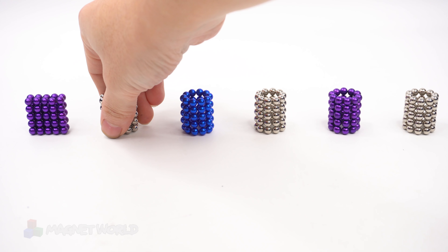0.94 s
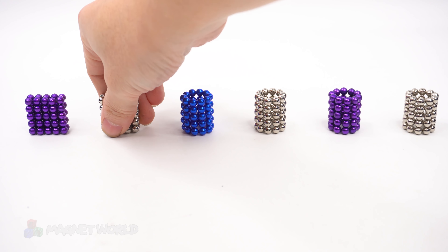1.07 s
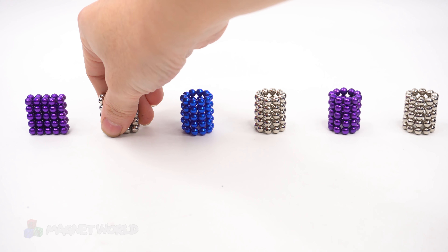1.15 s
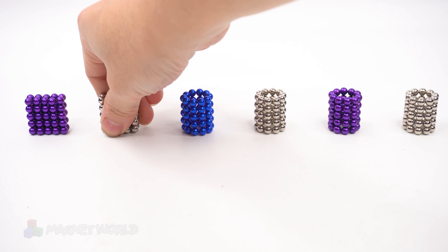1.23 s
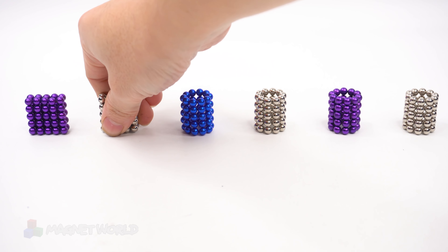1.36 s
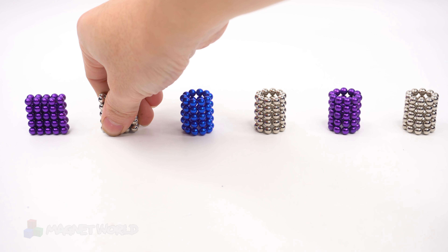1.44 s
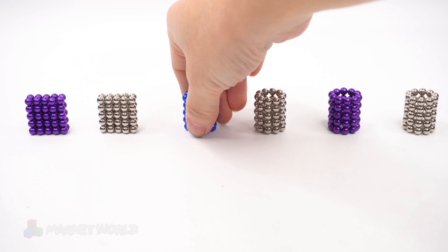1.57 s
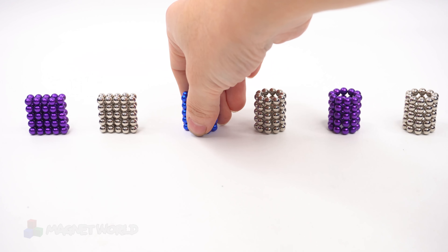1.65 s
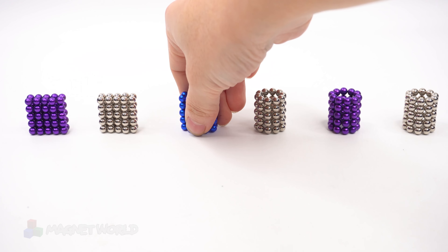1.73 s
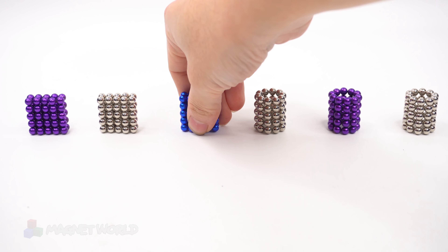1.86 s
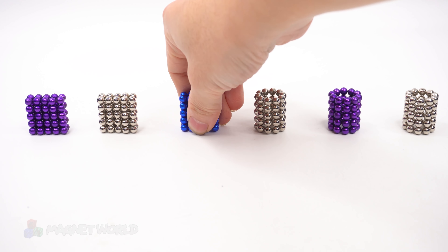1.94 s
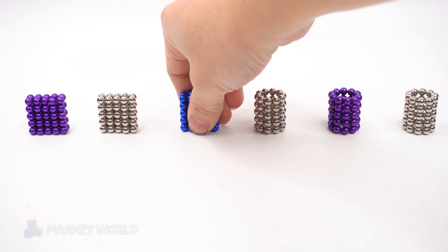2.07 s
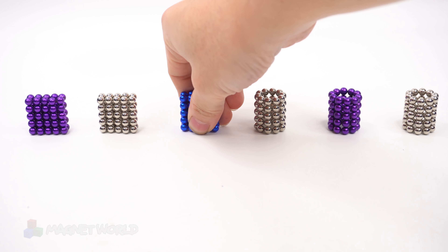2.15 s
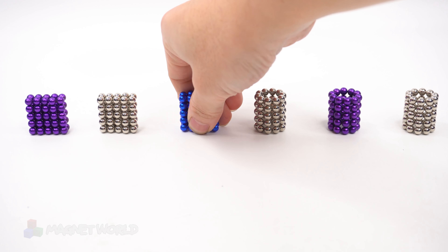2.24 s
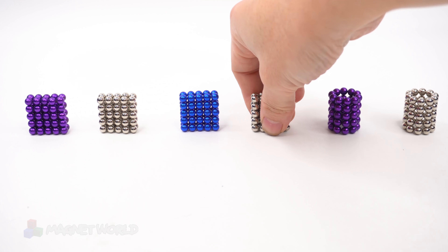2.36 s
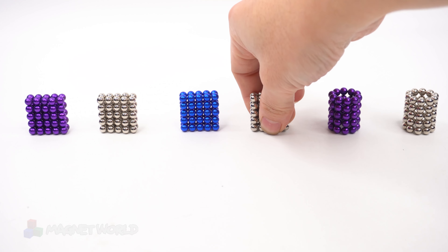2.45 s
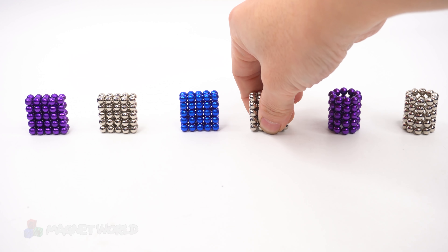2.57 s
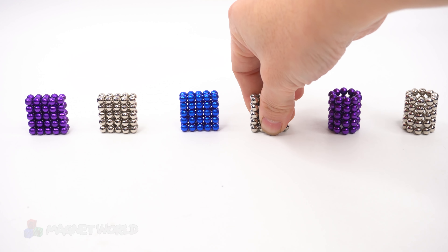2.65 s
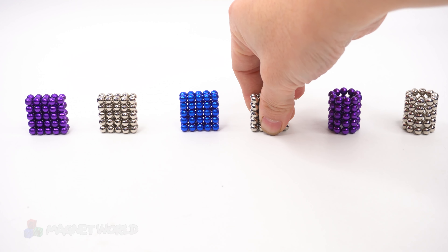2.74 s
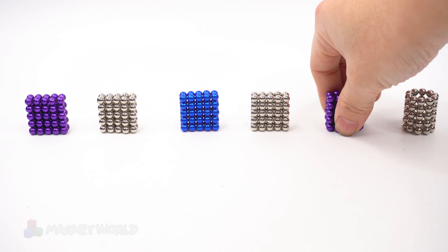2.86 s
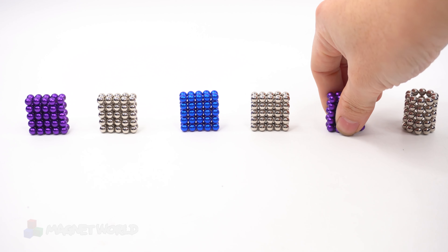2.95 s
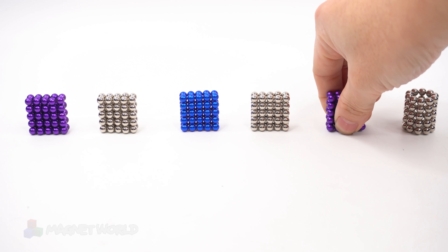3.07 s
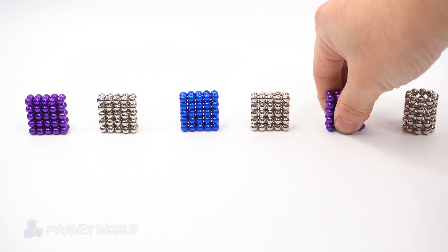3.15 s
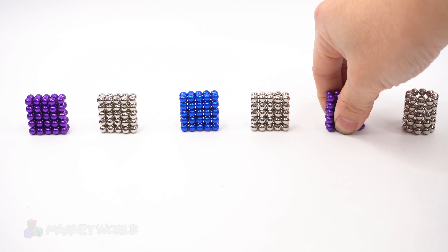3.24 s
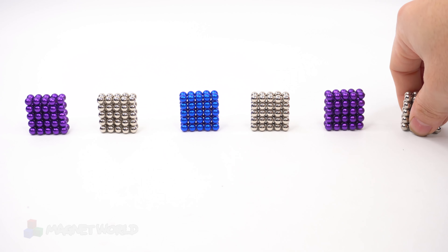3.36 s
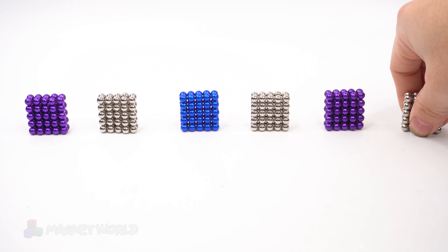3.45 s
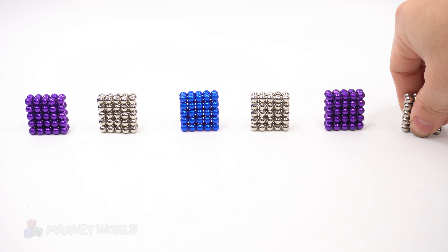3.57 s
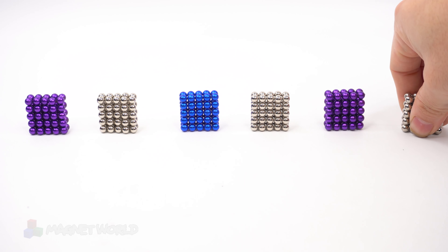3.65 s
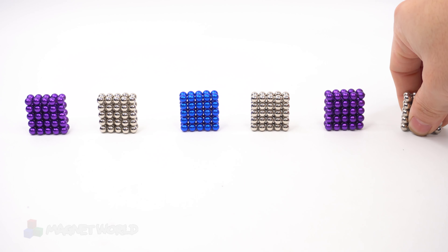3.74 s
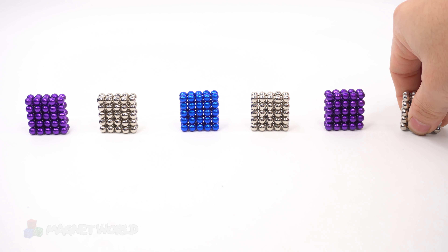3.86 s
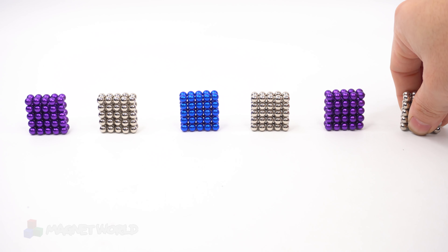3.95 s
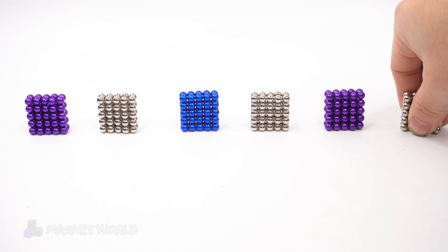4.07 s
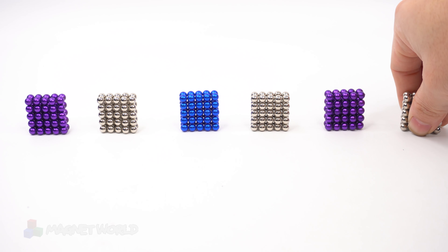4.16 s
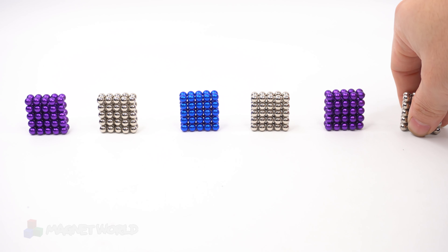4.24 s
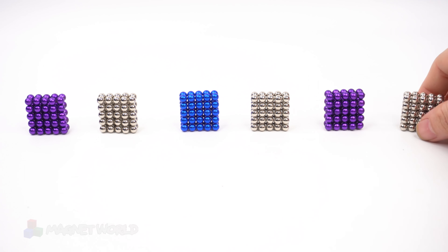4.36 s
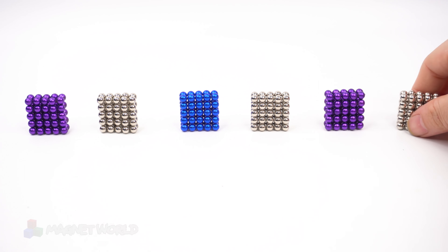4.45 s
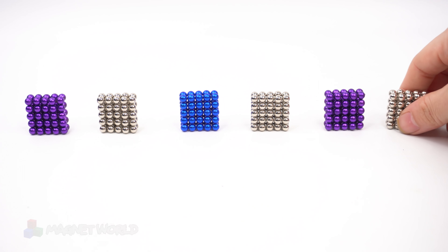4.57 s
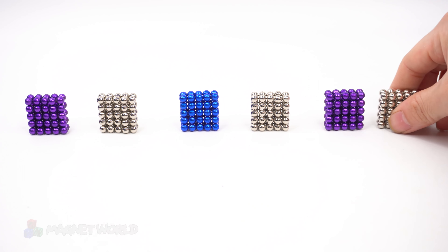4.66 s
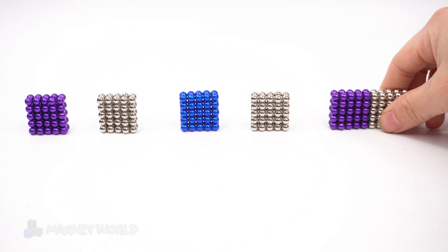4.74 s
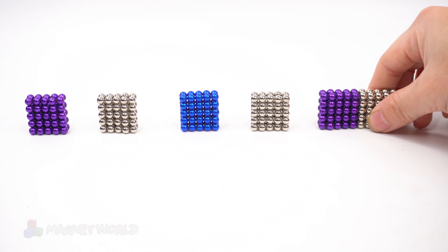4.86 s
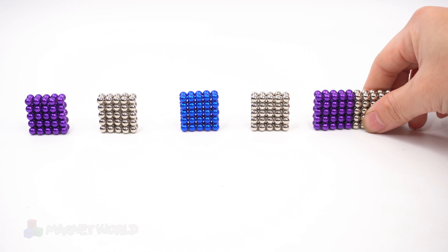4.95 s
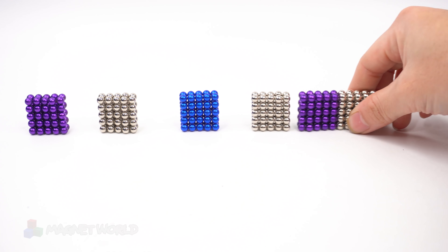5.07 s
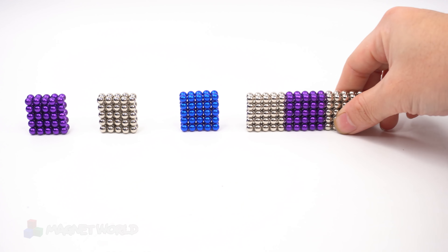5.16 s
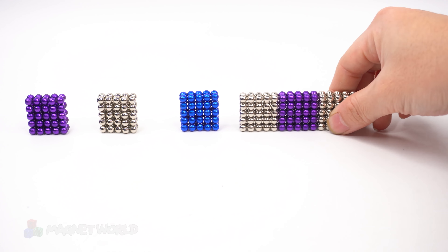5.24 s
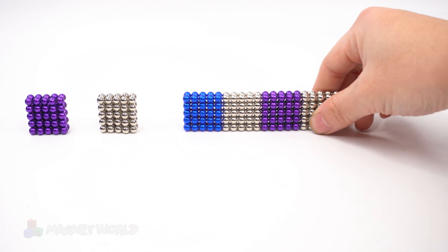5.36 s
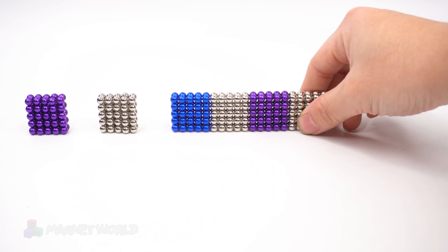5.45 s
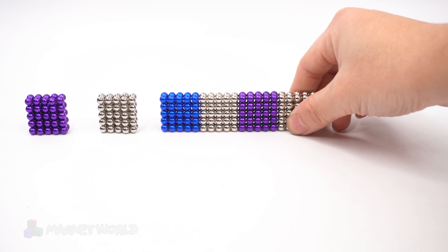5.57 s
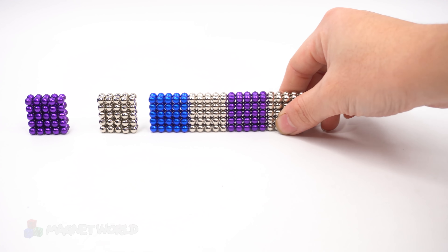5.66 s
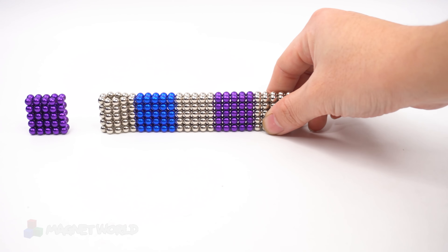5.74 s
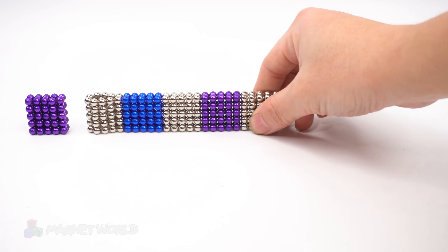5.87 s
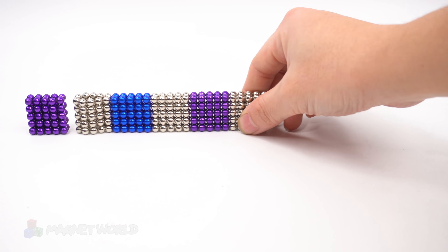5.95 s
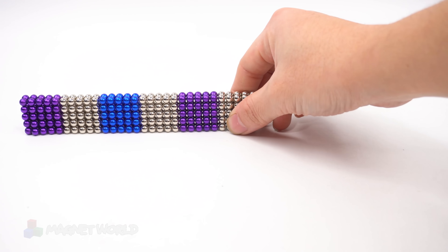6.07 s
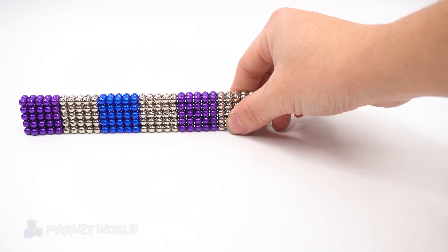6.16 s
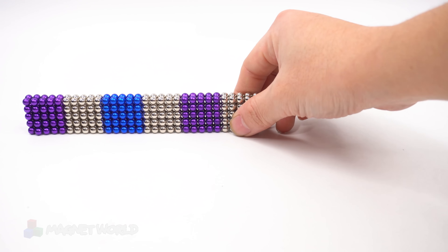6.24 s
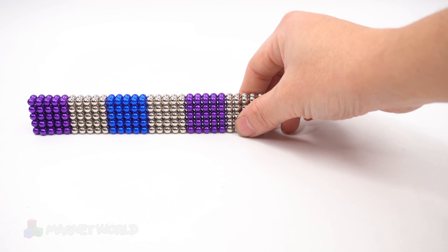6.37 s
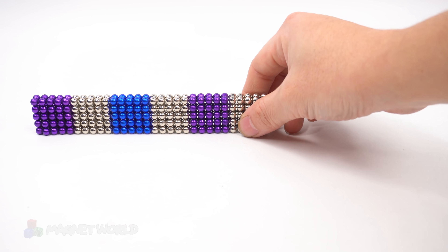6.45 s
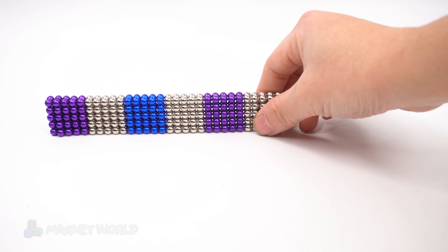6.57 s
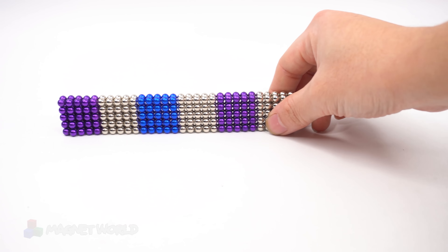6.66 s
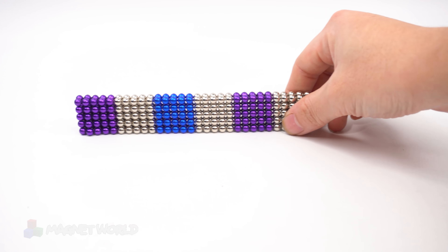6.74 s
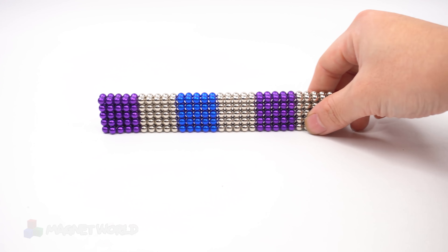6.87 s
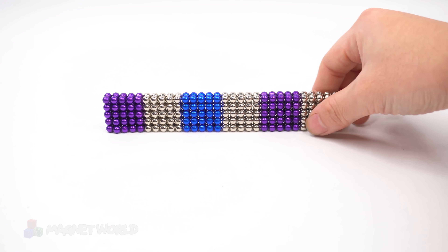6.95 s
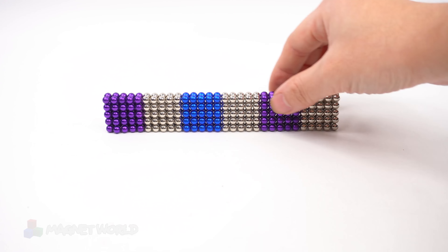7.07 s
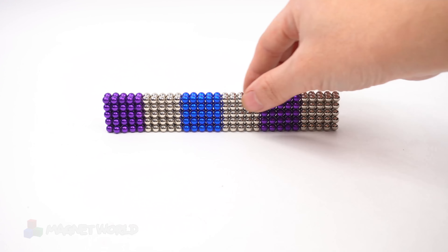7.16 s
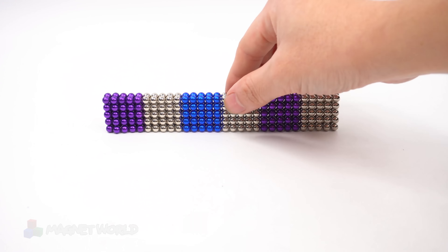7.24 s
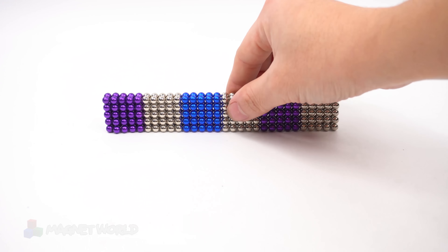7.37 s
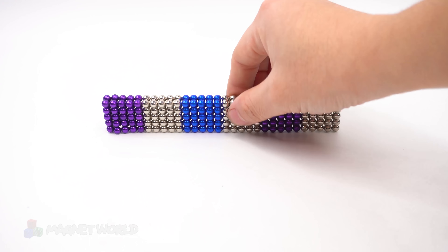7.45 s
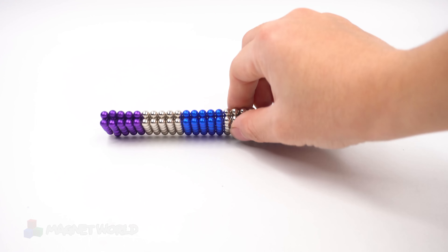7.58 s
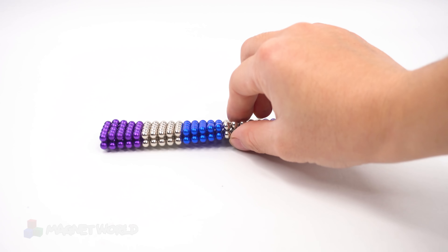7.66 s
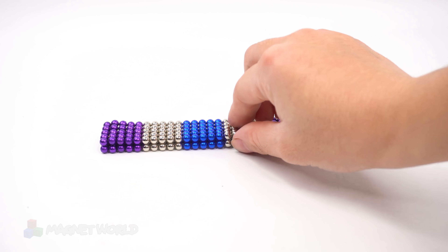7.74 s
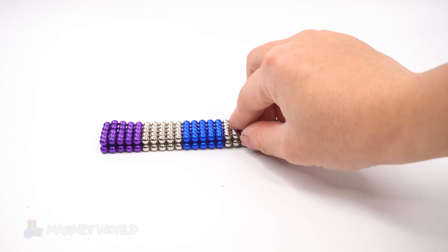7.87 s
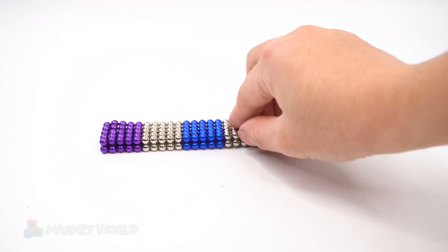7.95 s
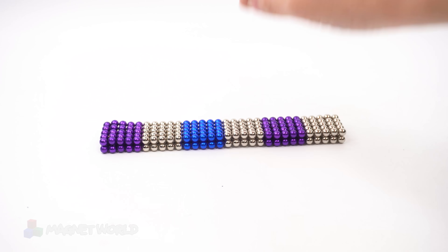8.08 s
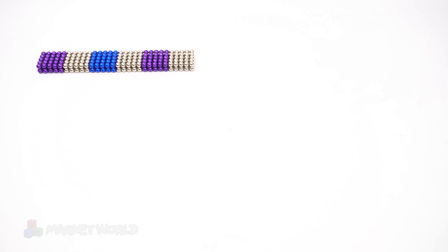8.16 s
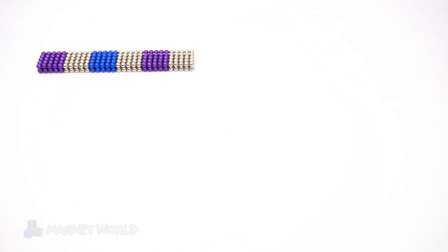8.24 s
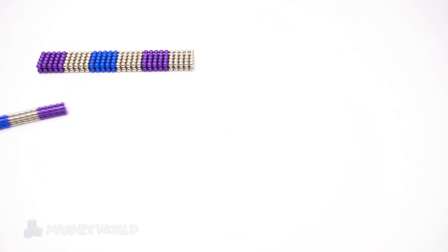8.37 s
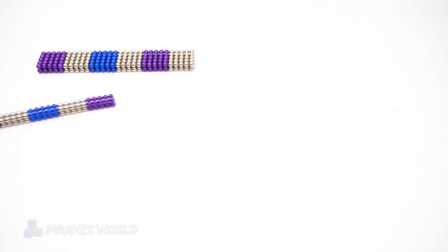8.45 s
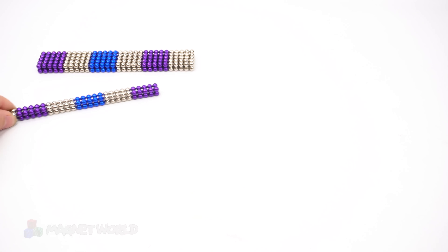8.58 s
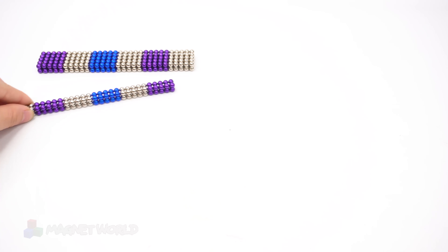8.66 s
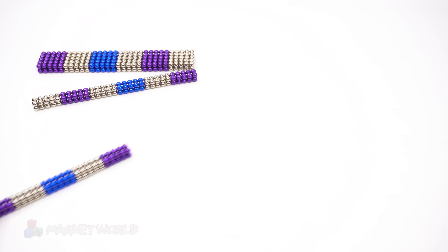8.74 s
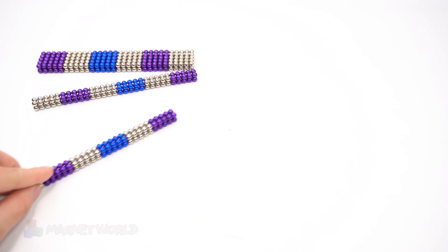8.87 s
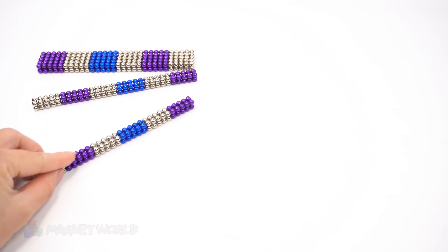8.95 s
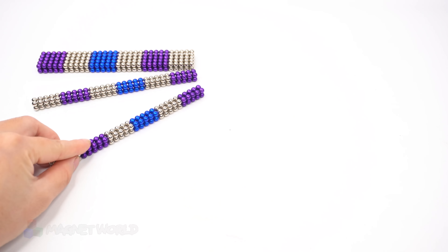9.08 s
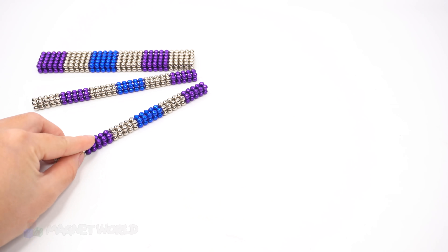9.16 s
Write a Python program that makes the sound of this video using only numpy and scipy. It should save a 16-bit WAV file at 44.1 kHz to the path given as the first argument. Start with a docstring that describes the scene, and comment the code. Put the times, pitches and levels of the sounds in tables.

```python
"""Cubes of small magnetic balls snap together on a table in a small room: dense flurries of collisions excite
resonances, and each blow thumps the modes of the table top. Before this, single balls tick under the fingers.
Between the snaps the blocks rub along the table; the bar is then dragged back and tipped over. Last, two strips
of balls skid in a dense rattle, filtered noise pulses whose treble dies and whose drone sinks as they slow down.
Low booms, wall reflections and a quiet hum and hiss complete the scene."""
import sys
import numpy as np
from scipy import signal
from scipy.fft import rfft, irfft, next_fast_len
from scipy.io import wavfile

SR = 44100
rng = np.random.default_rng(int(sys.argv[2]) if len(sys.argv) > 2 else 0)


def persist_wave(psi):
    """Save psi, clipped to +-1, as 16-bit WAV."""
    counts = np.round(np.clip(psi, -1, 1) * 32767).astype(np.int16)
    wavfile.write(sys.argv[1], SR, np.atleast_2d(counts).T)


N = 406161
TIME = np.arange(N) / SR
AGE = TIME[:SR // 2]   # seconds since a blow


def amp(db):
    """Level as a logarithm: 20 dB is a factor of ten in amplitude."""
    return 10 ** (np.asarray(db) / 20)


def rms_one(x):
    """Normalisation by effective value: scale to unit rms."""
    return x / np.sqrt(np.mean(x ** 2) + 1e-20)


def at_hz(points, hz):
    """Interpolation on a logarithmic frequency axis, where equal steps are equal intervals."""
    f, value = np.transpose(points)
    return np.interp(np.log(np.maximum(hz, 1)), np.log(f), value)


def gain_curve(s, db):
    """Envelope: a level curve, linear in dB, as gain; practically silent outside its points."""
    return amp(np.interp(TIME, s, db, left=-200, right=-200))


def add(out, s, sound):
    """Superposition: mix a sound in at a time in seconds."""
    i = int(s * SR)
    out[:, i:i + sound.shape[-1]] += sound[..., :N - i]


def pan(db):
    """Interaural level difference: left and right gains for left minus right in dB."""
    return amp(np.array([[db], [-db]]) / 2)


def stereo(pair, side_db):
    """Partial coherence: two signals serve as mid and side."""
    return pair[0] + amp(side_db) * pair[1] * np.array([[1], [-1]])


def band(x, low_hz, high_hz, order=2):
    """Causal band-pass filtering."""
    edges_hz = [low_hz, min(high_hz, SR * .48)]
    sos = signal.butter(order, edges_hz, "band", fs=SR, output="sos")
    return signal.sosfilt(sos, x + 1e-18)


def resonate(x, hz, width_hz):
    """Simple resonator: a pole pair whose bandwidth sets its damping, with gain 1 at the peak."""
    r = np.exp(-np.pi * width_hz / SR)
    zeros = np.array([1, 0, -1]) * (1 - r * r) / 2
    poles = [1, -2 * r * np.cos(2 * np.pi * hz / SR), r * r]
    return signal.lfilter(zeros, poles, x + 1e-18)


def colour(x, spectrum):
    """Linear filtering in the frequency domain: give a steady sound a spectrum, with rms 1."""
    length = x.shape[-1]
    size = next_fast_len(length)
    gain = amp(at_hz(spectrum, np.fft.rfftfreq(size, 1 / SR)))
    return rms_one(irfft(rfft(x, size) * gain, size)[..., :length])


def contacts(per_s, spread_db, size):
    """Random impulse train: ball collisions of uneven strength; independent signs decorrelate two copies."""
    strength = amp(spread_db * np.clip(rng.standard_normal(size), -2, 2))
    struck = rng.random(size) < per_s / SR
    return struck * strength * rng.choice([-1, 1], (2, size))


def flurry(settle_s, shape, side_db, rise_s):
    """Shot noise with a decaying envelope: collisions die away as the balls settle, heard through a filter."""
    fade = np.exp(-AGE / settle_s) * (1 - np.exp(-AGE / rise_s))
    pair = shape(contacts(16000, 1.8, size=len(AGE)) * fade)
    fade_rms = np.sqrt(np.mean(fade ** 2))
    return stereo([rms_one(p) for p in pair], side_db) * fade_rms


def drone(hz, band_hz):
    """Roughness excitation: one bumpy surface passed over faster or slower, so that pitch follows speed."""
    low_hz, high_hz = band_hz   # of the roughness when passed at a nominal 1 kHz
    undertone_db = -14.5        # coarser roughness, an octave below
    passed = np.cumsum(hz) / 1000
    bumps = stereo(contacts(6000, 1.2, size=len(hz)), -8.5)
    fine = rms_one(band(bumps, low_hz, high_hz))
    coarse = rms_one(band(bumps, low_hz / 2, high_hz / 2, order=1))
    roughness = fine + amp(undertone_db) * coarse
    return np.array([np.interp(passed, np.arange(len(hz)), side) for side in roughness])


def still_room():
    """Stationary background: noise shaped into rumble and hiss, plus the steady sinusoids of a faint hum."""
    # Spectrum of the still room. Each row: frequency in Hz, relative density in dB per Hz.
    room_spectrum = [(12, -28.5), (20, 2), (39, -9), (59, -19), (141, -20), (203, -28), (247, -25.5),
                     (300, -22.5), (326, -24.5), (456, -32.5), (713, -38), (916, -42.5), (1280, -44.5),
                     (1470, -45), (15800, -58)]
    # Partials of the hum. Each row: frequency in Hz, rms level in dB before panning.
    hum_partials = [(263.8, -75), (301.5, -73.5), (452.2, -72.5), (904.4, -82), (1055, -86)]
    hiss = amp(-50) * colour(stereo(rng.standard_normal((2, N)), -4.5), room_spectrum)
    hum = 0
    for hz, db in hum_partials:
        hum = hum + amp(db) * np.sqrt(2) * np.sin(2 * np.pi * (hz * TIME + rng.random()))
    return pan(4.7) * (hiss + hum)


def echoes(x, early_db, late_db, early_t60):
    """Reverberation: quick reflections from nearby walls, then a faint tail decaying band by band."""
    # Decay of the room. Each row: frequency in Hz, time to fall by 60 dB in seconds.
    room_t60 = [(150, .36), (1500, .28), (6000, .29), (15000, .27)]
    edges = np.geomspace(100, 20000, 9)
    late = 0
    for low, high in zip(edges, edges[1:]):
        noise = stereo(rng.standard_normal((2, len(AGE))), -7.0)
        late = late + band(noise, low, high) * amp(-60 * AGE / at_hz(room_t60, np.sqrt(low * high)))
    noise = stereo(rng.standard_normal((2, len(AGE))), -2.5)
    early = band(noise, 500, 20000, order=1) * amp(-60 * AGE / early_t60)
    # the reflections begin after 3 ms, the tail after 8 ms
    response = amp(early_db) * rms_one(early * (AGE > .003)) + amp(late_db) * rms_one(late * (AGE > .008))
    return signal.fftconvolve(x, response / np.sqrt(len(AGE)), axes=1)[:, :N]


def booms():
    """Frequency-modulated sinusoid: a brief low, nearly pure shudder that rises a little in pitch."""
    # Low booms. Each row: start in seconds, length in seconds, level in dB before panning,
    # first frequency in Hz, last frequency in Hz.
    boom_rows = [(1.18, 0.13, -27, 57, 75.2), (6.178, 0.11, -32, 69, 80)]
    attack_s, release_s = .025, .025   # time constants
    out = np.zeros((2, N))
    for s, length_s, db, first_hz, last_hz in boom_rows:
        release = np.exp(-np.maximum(AGE - length_s, 0) / release_s)
        level = (1 - np.exp(-AGE / attack_s)) * release
        hz = np.interp(AGE, [0, length_s], [first_hz, last_hz])
        tone = np.sin(2 * np.pi * np.cumsum(hz) / SR)
        add(out, s, pan(7.1) * amp(db) * level * tone)
    return out


def slides():
    """Friction noise: rows of balls rub over the groaning table; faster strokes are louder and higher, with grit."""
    # The whole bar is dragged back. Each row: time in seconds, rub level in dB, grit level in dB,
    # both before the gains and panning below.
    drag_curve = [(6.58, -52.5, -77), (6.606, -48, -83), (6.66, -38, -71), (6.758, -37.5, -59),
                  (6.784, -32, -65), (6.848, -36, -53), (6.938, -28.5, -43.5), (7.01, -34, -59.5),
                  (7.07, -61, -80.5)]
    # A block slides a short way. Each row: time when fastest in seconds, swell in seconds, fade in seconds,
    # rub level in dB, grit level in dB, both before the gains and panning below.
    short_slides = [(4.49, .06, 0.29, -68, -66.5), (4.83, .12, .03, -53, -75.5),
                    (5.185, .11, .05, -39, -68), (5.48, .1, .1, -35.5, -62), (5.533, .06, .25, -32, -65.5),
                    (5.79, .2, .05, -34.5, -69), (6.095, .15, .04, -35.5, -65), (6.4, .06, .17, -49.5, -82),
                    (7.01, .02, 0.049, -35, -65)]
    # Spectrum of the table's groan. Each row: frequency in Hz, relative density in dB per Hz.
    groan_spectrum = [(71, -49.5), (120, -29.5), (157, -8), (201, -20), (253, -1.5), (354, -5.5),
                      (380, -1.5), (505, -20), (572, -10), (659, -29), (1000, -39), (1300, -54),
                      (2200, -120)]
    # Spectrum of the fine grit. Each row: frequency in Hz, relative density in dB per Hz.
    grit_spectrum = [(400, -26), (600, 4), (800, 0), (1340, -1.5), (1580, -7.5), (2090, -1.5), (2470, -12),
                     (3060, -10.5), (14000, -43)]
    range_db = 26   # rise over the swell, fall over the fade
    drag_pan_db, slide_pan_db = 9, 6   # left minus right
    groan_db, rubbing_db, scratch_db = -3.5, -4, -4   # gains of the three parts
    base_hz, base_at_db, db_per_octave = 364.2, -31, 42   # passing rate as a function of rub level

    s, rub_db, grit_db = np.transpose(drag_curve)
    rub = pan(drag_pan_db) * gain_curve(s, rub_db)
    grit = gain_curve(s, grit_db)
    for s, swell_s, fade_s, rub_db, grit_db in short_slides:
        distance = np.maximum((s - TIME) / swell_s, (TIME - s) / fade_s).clip(0, 10)
        stroke = amp(-range_db * distance)
        rub = rub + pan(slide_pan_db) * amp(rub_db) * stroke
        grit = grit + amp(grit_db) * stroke

    octaves = (20 * np.log10(rub.mean(0)) - base_at_db) / db_per_octave
    rubbing = drone(base_hz * 2 ** np.maximum(octaves, -1), band_hz=(860, 1160))
    groan = colour(stereo(contacts(2500, 5.8, size=N), -5.5), groan_spectrum)
    scratch = colour(stereo(contacts(2000, 3.4, size=N), -12.0), grit_spectrum)
    rubbed = rub * (amp(groan_db) * groan + amp(rubbing_db) * rubbing)
    return rubbed + pan(19.0) * amp(scratch_db) * grit * scratch


def skids():
    """Chatter of repeated impacts: all balls of a fast strip rattle; slowing, the treble dies and the drone sinks."""
    # A strip is thrown. Each row: start in seconds, time it starts to slow in seconds, time it comes to rest
    # in seconds, drone passing rate in Hz and drone level in dB (before panning) at full speed,
    # sizzle level in dB relative to the clack.
    throws = [(8.227, 8.563, 8.83, 881.7, -31.5, 0), (8.811, 8.986, 9.24, 799.3, -32.5, -9)]
    # How hard each strip chatters, one list per strip. Each row: time in seconds, level of the table's ring
    # in dB, level of the balls' clack in dB, both before trim and panning.
    chatter = [
        [(8.235, -22.5, -27.5), (8.271, -17.5, -21), (8.283, -15.5, -23), (8.369, -22.5, -17.5),
         (8.461, -25.5, -30), (8.569, -22.5, -39), (8.593, -30, -44), (8.8, -47.5, -71.5)],
        [(8.82, -27.5, -24), (8.848, -20, -25), (8.944, -26, -29), (9.026, -26, -38), (9.106, -46.5, -60),
         (9.2, -59, -81)],
    ]
    # Spectrum of the rattle, one list per strip. Each row: frequency in Hz, relative density in dB per Hz.
    rattle_spectra = [
        [(530, -30.5), (900, 10.5), (1350, -3), (1540, 5.5), (1750, 1.5), (2820, -7.5), (3260, -11.5),
         (3540, -13.5), (5370, -13.5), (6120, -10.5), (6900, -18), (13300, -15.5), (15500, -16)],
        [(900, -22), (1500, -8), (2100, -12), (2800, -14), (5500, -17.5), (9000, -23.5), (15500, -20)],
    ]
    # Strip and table ringing. Each row: frequency in Hz, bandwidth in Hz, gain in dB before the spectrum.
    strip_rings = [(1226, 34, 4), (1424, 110, 11.5), (1830, 290, 5.5), (2180, 130, 2.5), (2910, 160, 4.5),
                   (3580, 140, 12), (4350, 300, 5), (6080, 73, 0.5)]
    # Ring, clack and sizzle. Each row: low edge in Hz, high edge in Hz, trim in dB, left minus right in dB.
    registers = [(955, 2860, -2.2, 2.7), (2500, 6330, -1.5, 9.2), (6770, 15600, -3.0, 7.6)]
    hop_loss_db, hop_fade_s = 22, .028   # a slowing strip stops hopping and loses its sizzle
    drone_db_per_decade = 40             # the drone fades as the speed falls
    attack_s, release_s = .0059, .058

    out = np.zeros((2, N))
    for throw, rows, spectrum in zip(throws, chatter, rattle_spectra):
        start, slow_s, rest_s, drone_hz, drone_db, sizzle_db = throw
        t = start + TIME[:SR]
        s, *columns = np.transpose(rows)
        ring_db, clack_db = [np.interp(t, s, c) for c in columns]

        # the squared speed falls linearly; the speed itself is held at a tenth or more
        slowing_s = np.maximum(t - slow_s, 0)
        speed = np.sqrt(np.clip(1 - slowing_s / (rest_s - slow_s), .01, 1))
        hop_db = clack_db + sizzle_db - hop_loss_db * (1 - np.exp(-slowing_s / hop_fade_s))

        impacts = stereo(contacts(3500, 1.3, size=SR), -9.0)
        ringing = sum(amp(db) * resonate(impacts, hz, width) for hz, width, db in strip_rings)
        rattle = colour(impacts + ringing, spectrum)

        drone_gain = amp(drone_db + drone_db_per_decade * np.log10(speed))
        sound = pan(11.5) * drone_gain * drone(drone_hz * speed, band_hz=(664, 1370))
        for (low, high, trim_db, pan_db), db in zip(registers, (ring_db, clack_db, hop_db)):
            part = rms_one(band(rattle, low, high, order=4))
            sound = sound + pan(pan_db) * amp(db + trim_db) * part
        gate = np.interp(t, [start, start + attack_s, s[-1], s[-1] + release_s], [0, 1, 1, 0])
        add(out, start, sound * gate)
    return out


def ticks():
    """Impact excitation in miniature: a ball hops into its neighbour's hollow, with a soft push on the table."""
    # Single balls shift in the grip. Each row: start in seconds, sizzle level in dB, clack level in dB,
    # clack frequency in Hz, knock level in dB, knock frequency in Hz, thump level in dB;
    # levels are relative, before the gains and panning below.
    tick_rows = [(0.5444, -51, -42.5, 6000, -51.5, 1500, -45), (0.633, -56, -52.5, 4980, -60, 912, -65),
                 (0.7653, -45, -43.5, 4100, -51.5, 2210, -42),
                 (1.1729, -20.5, -49.5, 5420, -55.5, 1820, -35.5), (1.2524, -28, -67, 3080, -73, 915, -44),
                 (1.4468, -28.5, -59, 5070, -60, 1510, -58), (1.9779, -35, -43.5, 4400, -47.5, 1980, -47.5),
                 (2.4065, -25.5, -50.5, 6900, -50, 980, -39.5), (2.5473, -32.5, -62, 6490, -76, 902, -48.5),
                 (2.7439, -33, -59.5, 6600, -61, 953, -59), (2.9873, -41, -46.5, 3940, -58, 1940, -42),
                 (3.058, -42, -48, 4900, -60, 1890, -44.5), (3.1631, -48, -60.5, 5750, -69, 902, -44),
                 (3.477, -26.5, -57, 4320, -51, 1850, -38.5), (3.5484, -37.5, -62, 5430, -75, 1060, -50),
                 (3.6037, -35, -64, 6940, -63, 1520, -71), (3.8387, -36.5, -76, 3190, -72, 1350, -70)]
    sizzle_gain_db, clack_gain_db, knock_gain_db, thump_gain_db = -3, 4, 0, 2
    body_hz, thump_hz = 680, 138   # the block's hollow body; the push on the table

    out = np.zeros((2, N))
    for s, sizzle_db, clack_db, clack_hz, knock_db, knock_hz, thump_db in tick_rows:
        def sizzle_filter(x):
            return resonate(band(x, 9800, 17200), 17200, 2400)

        def clack_filter(x):
            rings = resonate(x, clack_hz, 3300) + 1.1 * resonate(x, clack_hz, 250)
            return band(rings, 1500, 11600, order=1)

        def knock_filter(x):
            rings = resonate(x, knock_hz, 620) + .5 * resonate(x, body_hz, 430)
            return band(rings, 300, 1700)

        def push_filter(x):
            return band(resonate(x, thump_hz, 58), 43, 298)

        sizzle = flurry(.0034, sizzle_filter, -5.0, rise_s=.0001)
        clack = flurry(.0026, clack_filter, -4.5, rise_s=.00019)
        knock = flurry(.012, knock_filter, -12.0, rise_s=.0012)
        push = flurry(.035, push_filter, -2.0, rise_s=.0046)
        body = amp(clack_db + clack_gain_db) * clack + amp(knock_db + knock_gain_db) * knock
        tick = pan(4.9) * amp(sizzle_db + sizzle_gain_db) * sizzle + pan(5.9) * body
        add(out, s, tick + pan(7.5) * amp(thump_db + thump_gain_db) * push)
    return out


def thump(centre_hz, contact_s):
    """Modal synthesis: the table top's damped modes after a push that builds over the contact time."""
    # Modes of the table top. Each row: frequency in Hz, level in dB before the detuning loss,
    # time to fall by 60 dB in seconds.
    table_modes = [(70, -14, 0.83), (90.4, -12, 0.43), (134.8, -0.5, 0.2), (156, -3, .18), (171.5, 2, 0.17),
                   (263, -10.5, 0.32), (323, -13, 0.24), (387.3, -12.5, .16), (457, -13.5, 0.14),
                   (587, -15, 0.15)]
    hz, db, t60 = np.transpose(table_modes)[:, :, None]
    # modes far from the thump pitch are driven less (7.5 dB per octave), except from an octave above it up
    octaves_off = np.abs(np.log2(hz / centre_hz))
    db = db - 7.5 * octaves_off * (hz < 2 * centre_hz)
    swing = np.sin(2 * np.pi * (hz * AGE + rng.random(hz.shape)))
    return (swing * amp(db - 60 * AGE / t60)).sum(0) * (1 - np.exp(-AGE / contact_s))


def knock_body(x, knock_hz):
    """Parallel resonances: a broad one with a ringing core, set by the blow, and rings that all blows share."""
    # Rings shared by every knock. Each row: frequency in Hz, bandwidth in Hz, relative gain in dB.
    knock_rings = [(1497, 20, 4), (1900, 70, 1), (2174, 80, 1)]
    rings = sum(amp(db) * resonate(x, hz, width) for hz, width, db in knock_rings)
    core = resonate(x, knock_hz, 950) + 3.2 * resonate(x, knock_hz, 35)
    return band(core + rings, 980, 5000)


def snaps():
    """Multiple impact: hundreds of balls collide in milliseconds; steel sizzles, blocks clack, the table thumps."""
    # Blocks strike. Each row: start in seconds, thump frequency in Hz, thump level in dB, clatter level in dB,
    # knock frequency in Hz, knock level in dB, clack frequency in Hz, clack level in dB, sizzle level in dB,
    # settling time in seconds; levels are relative, before panning.
    snap_rows = [(4.8355, 123, -21.5, -20.5, 1550, -11, 5800, -11, -6, .0046),
                 (5.2015, 138, -16.5, -19.5, 1980, -17.5, 7600, -11.5, -5, .0037),
                 (5.469, 134.3, -23, -24, 2820, -16.5, 7400, -10, -8.5, .0032),
                 (5.8093, 160.4, -16.5, -17.5, 2300, -15.5, 4900, -4, -8, .0045),
                 (6.098, 140, -24, -14.5, 2200, -10.5, 5400, -11.5, -7, .0032),
                 (7.815, 175, -63.5, -41, 1520, -39.5, 4500, -59, -66.5, .005),
                 (7.826, 174, -49.5, -39, 1500, -25, 4520, -42.5, -57, .004),
                 (7.832, 180, -17.5, -19, 1541, -7.5, 6000, -4, -22, .0033)]
    out = np.zeros((2, N))
    for row in snap_rows:
        s, thump_hz, thump_db, clatter_db, knock_hz, knock_db, clack_hz, clack_db, sizzle_db, settle_s = row

        def sizzle_filter(x):
            return band(x, 11800, 15600, order=1)

        def clack_filter(x):
            return band(resonate(x, clack_hz, 2600), 1500, 10000)

        sizzle = flurry(settle_s, sizzle_filter, -7.5, rise_s=.00008)
        clack = flurry(settle_s, clack_filter, -8.0, rise_s=.00037)
        knock = flurry(settle_s * 2.6, lambda x: knock_body(x, knock_hz), -7.5, rise_s=.0019)
        clatter = flurry(.015, lambda x: band(x, 320, 1600), -5.5, rise_s=.0054)
        balls = amp(sizzle_db) * sizzle + amp(clack_db) * clack + amp(knock_db) * knock
        table = amp(thump_db) * thump(thump_hz, contact_s=.0077)
        add(out, s, pan(1.4) * balls + pan(2.6) * amp(clatter_db) * clatter + pan(5.5) * table)
    return out


def scene():
    """Superposition of direct sound and reflections: everything on the table, heard from close by."""
    blows, small, moves = snaps(), ticks(), slides() + skids()
    # a block radiates a different flurry in each direction, so the walls also return one not heard directly
    walls = sum(echoes(x, early_db=-17.5, late_db=-27.0, early_t60=.1) for x in (blows, snaps()))
    walls += echoes(small, early_db=-9.0, late_db=-17.5, early_t60=.077)
    walls += echoes(moves, early_db=-10.0, late_db=-20.5, early_t60=.076)
    return blows + small + moves + walls + booms() + still_room()


def record(dry):
    """Overload and band limiting: peaks beyond full scale are clipped, then a steep low-pass cuts the top."""
    low_pass = signal.cheby2(16, 50, 16450, fs=SR, output="sos")   # 50 dB down from 16450 Hz
    return signal.sosfilt(low_pass, np.clip(dry, -1, 1))


dry = scene()
out = record(dry)
persist_wave(out)
```